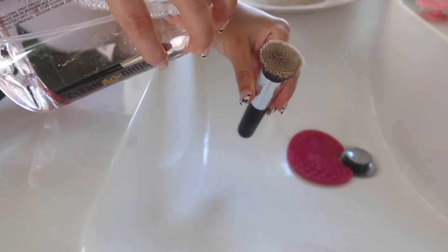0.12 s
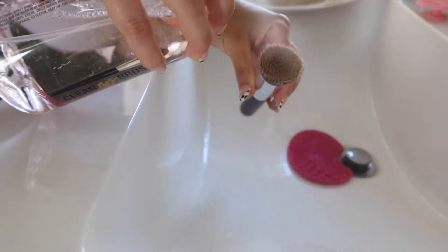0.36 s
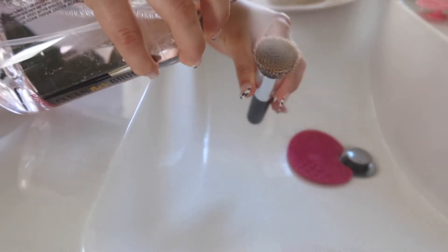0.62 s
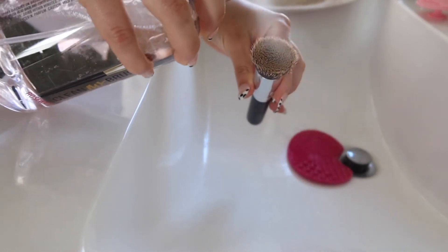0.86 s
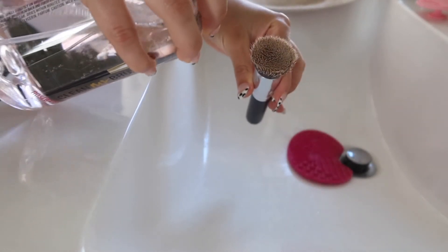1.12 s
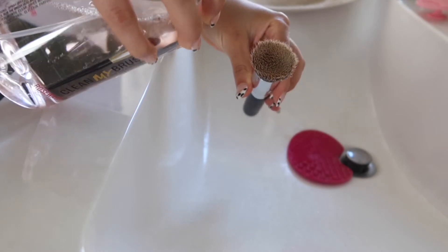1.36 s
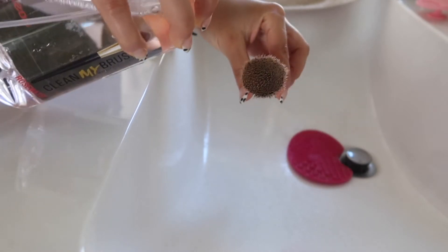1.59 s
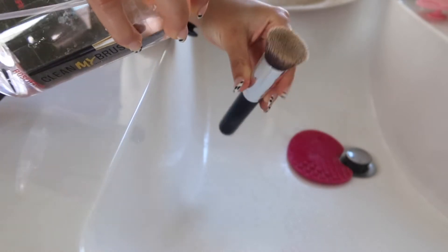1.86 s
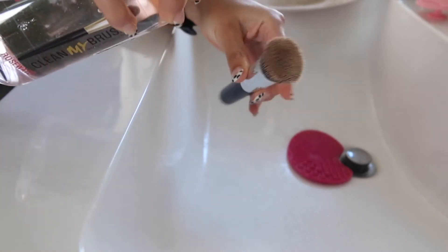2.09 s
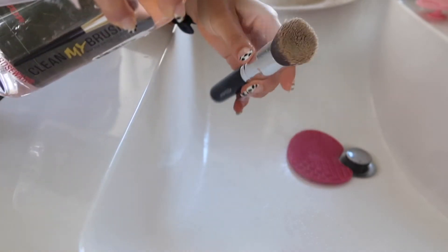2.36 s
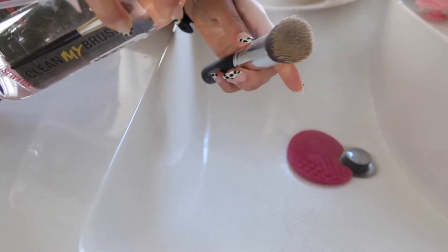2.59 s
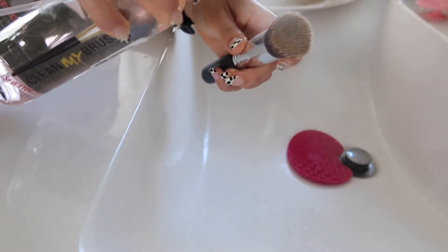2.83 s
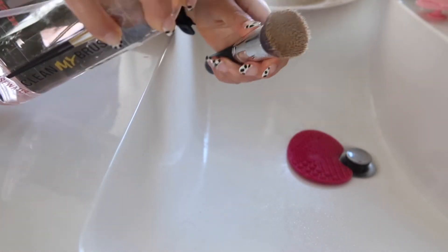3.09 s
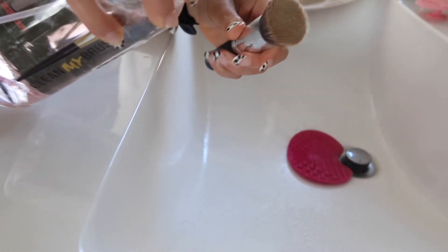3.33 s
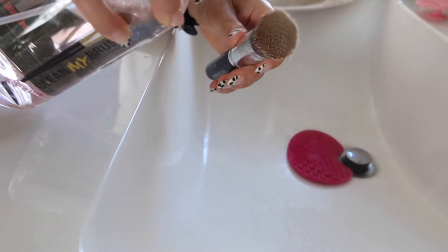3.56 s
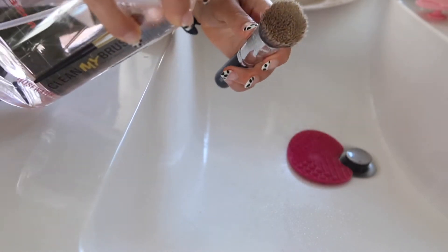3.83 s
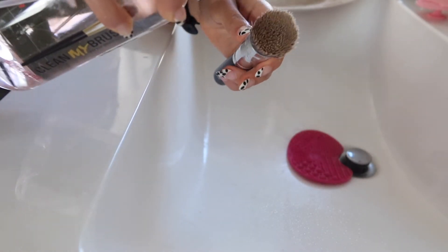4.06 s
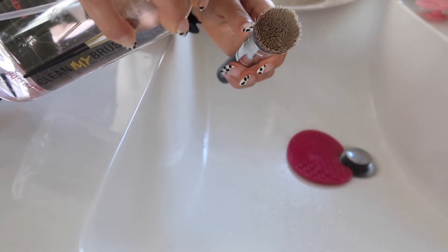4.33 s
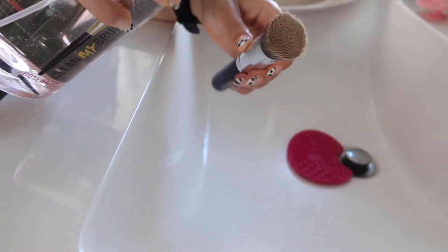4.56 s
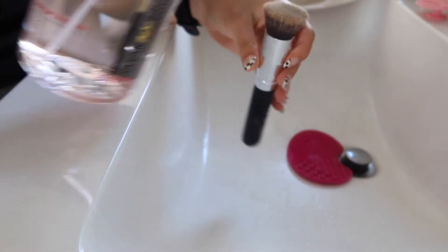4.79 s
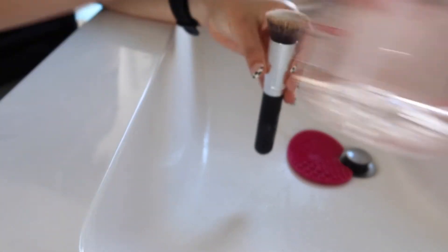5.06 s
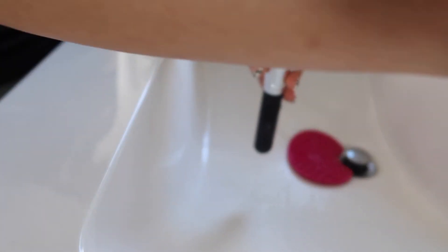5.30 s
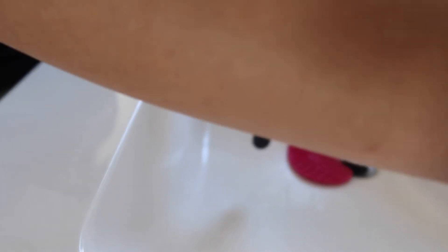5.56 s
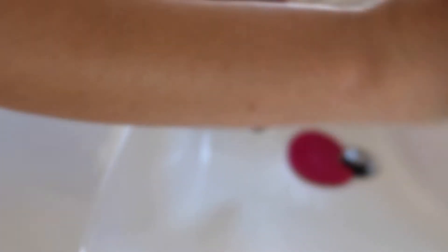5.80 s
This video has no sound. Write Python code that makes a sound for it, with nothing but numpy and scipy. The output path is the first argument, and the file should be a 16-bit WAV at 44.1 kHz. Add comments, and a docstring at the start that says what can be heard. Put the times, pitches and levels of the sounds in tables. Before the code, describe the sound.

A plastic pump bottle is squeezed rapidly about sixteen times, clicking and hissing mist, then thumps down on a counter as a tap starts running.

```python
"""A plastic pump knocks over faint room air, the counter thuds softly under the working arm, mist hisses out.
Sixteen squeezes; then the bottle is set down on the counter and a tap starts to run into the basin.
Knocks and thuds: struck dying modes, thuds with noise clatter. Arm: low sine swells.
Spray and water: coloured droplet clicks over turbulence. Air: drifting noise. Echoes: sparse random taps."""
import sys
import numpy as np
from scipy import signal
from scipy.fft import rfft, irfft
from scipy.io import wavfile
from scipy.ndimage import uniform_filter1d

SR = 44100
rng = np.random.default_rng(int(sys.argv[2]) if len(sys.argv) > 2 else 0)


def voltage_ratio(level):
    """Linear amplitude factor for a level in decibels (scalar or array-like)."""
    return 10 ** (np.asarray(level, float) / 20)


def materialize(psi):
    """Save the field psi as 16-bit PCM at rate SR to the path in sys.argv[1].

    A 1-D psi becomes a single channel; in a 2-D psi each row is a channel.
    """
    bounded = np.clip(np.atleast_2d(psi).T, -1, 1)
    quanta = np.round(bounded * 32767).astype(np.int16)
    wavfile.write(sys.argv[1], SR, quanta)


N = 261072

# steady room air: f/Hz, relative level/dB
AIR = [(12, -28), (20, 10), (109, -8), (149, -7), (274, -12), (307, -10), (465, -11), (550, -19),
       (615, -14), (687, -20), (768, -19.5), (3090, -27), (15600, -46.5)]
# left-right likeness of the air: f/Hz, likeness/1
AIR_SAME = [(60, 1), (240, 0.39), (950, 0.13), (3770, 0.44), (15000, 0.067)]
AIR_RMS_DB = -45.5

# modes of the hollow bottle body: f/Hz, relative level/dB, t60/s
BODY = [(253, -21, 0.036), (318, -36.5, 0.066), (383.5, 3, 0.041), (467, 1, 0.055), (647, -7, 0.02),
        (923, -14, 0.075), (1043, -18, 0.024)]
# modes of the pump head: f/Hz, relative level/dB, t60/s
HEAD = [(1030, -27, 0.005), (1460, -28, 0.0092), (1650, -14.5, 0.0098), (1860, -9.5, 0.016),
        (2215, 4, 0.021), (2603, 6, 0.0077), (2630, -12, 0.0086), (3600, -22, 0.005), (4370, -41, 0.0055)]
# modes of the bright snap: f/Hz, relative level/dB, t60/s
SNAP = [(4000, 3.5, 0.015), (4630, 12.5, 0.0036), (6460, 9.5, 0.0037), (8110, 8.5, 0.012),
        (10200, -45, 0.0035), (13900, 23, 0.0015)]
# how each part is hit: modes, contact/samples, contacts per rattle, longest t60/s
PARTS = [(BODY, 27, 2, .03), (HEAD, 11, 8, .014), (SNAP, 3, 24, .005)]
# finger drives the plunger down: t/s, peak level/dB, body level/dB rel
PRESSES = [(0.002, -32.5, 1), (0.2638, -40, -6), (0.562, -18.5, -14.5), (0.85, -22.5, -5),
           (1.1379, -23, -6.5), (1.4198, -25.5, -11), (1.692, -25, -10), (1.9776, -21.5, -4.5),
           (2.2645, -20, -4.5), (2.535, -21, -3), (2.8042, -20.5, -3), (3.0841, -17, -3.5),
           (3.3531, -20, -4.5), (3.6216, -21, -3), (3.8841, -21.5, -2), (4.1649, -20, -3.5)]
# plunger lets go with a hollow thump: t/s, peak level/dB, body level/dB rel
RETURNS = [(0.4232, -31, 7.5), (1.5869, -36, 12), (1.8407, -28.5, 7), (2.1315, -29, 9), (2.4244, -32, 5.5),
           (2.6919, -32.5, 4), (2.9638, -29, 6), (3.2354, -32.5, 9.5), (3.519, -27.5, 7),
           (3.7787, -31.5, 10.5), (4.0542, -30.5, 12), (4.337, -33, 10.5), (4.519, -39, 8.5)]
# head ticks against its upper stop: t/s, peak level/dB, body level/dB rel
STOPS = [(0.2, -28.5, 1), (0.4838, -27, 1), (0.5072, -29, -7), (0.7401, -32, -8), (0.789, -26.5, -1.5),
         (1.069, -27, 0.5), (1.3278, -35.5, -17), (1.3633, -28, 2.5), (1.652, -35, 6.5), (1.9045, -40, 8),
         (1.917, -37.5, 8.5), (2.2125, -31, 5.5), (2.4976, -31, 2.5), (2.7494, -35, -19), (2.767, -30, 2),
         (3.0387, -31, 1), (3.3156, -22, -6.5), (3.5934, -32, 0), (3.8538, -26.5, -2), (4.13, -31.5, 0.5),
         (4.4114, -27, 2), (4.6573, -28.5, -3), (5.03, -32.5, -29)]
# bright ticks as the grip on the bottle shifts: t/s, peak level/dB, body level/dB rel
NAILS = [(5.0651, -34.5, -9), (5.0797, -31.5, -10), (5.0864, -45, 1), (5.1645, -36, 1.5), (5.245, -49, 9)]
# kinds of knock: knocks, snap level/dB rel, hardness/dB per octave
KINDS = [(PRESSES, -2.5, 0.39), (RETURNS, -9, 2.5), (STOPS, -40, 0.3), (NAILS, 3.4, -3.5)]
RATTLE_S, RATTLE_S_PER_DB = .0035, .0005  # length at -30 dB; harder knocks rattle longer
PLASTIC_LOW_HZ = 160

# soft pushes of the arm on the counter: t/s (swell starts 10 ms before), peak level/dB, f/Hz
PUSHES = [(0.009, -28, 99), (0.05, -31, 115), (0.144, -30, 133), (0.21, -27.5, 113), (0.259, -39, 108),
          (0.308, -34, 110), (0.426, -23, 119), (0.49, -24, 136), (0.517, -30, 113), (0.567, -23, 116),
          (0.726, -32, 112), (0.798, -26, 117), (0.859, -28.5, 123), (1.01, -26.5, 111),
          (1.077, -28.5, 110), (1.153, -29, 116), (1.197, -39, 120), (1.303, -24.5, 114.5),
          (1.363, -30, 122), (1.43, -36.5, 131.8)]
PUSH_S, PUSH_T60_S = 0.022, .062  # lean-in, then decay
# low thuds, the one at 1.48 s swelling again: t/s, peak level/dB, tilt/dB per octave,
# clatter level/dB rel, swell/s, place struck/0-1
THUDS = [(1.482, -10.5, -17, -12.5, 0.0031, .15), (1.523, -20.5, -2, -24, 0.0017, 0),
         (5.531, -3.5, -0.36, -5.5, 0.0015, .85)]
# counter modes: f/Hz, relative level/dB, t60/s
COUNTER = [(86.4, -18, 0.29), (104.1, 4.5, 0.21), (121, 7.5, 0.11), (148.7, 12, 0.17), (188.3, -4.5, 0.36),
           (303, -16, 0.11), (374, -25, 0.57), (435, -24.5, 0.32), (620, -37, 0.4), (630, -8.5, 0.16),
           (720, -23, 0.27), (726, -25, 0.16), (768, -15, 0.2), (1044, -17, 0.1), (1170, -17, 0.17),
           (1210, -22, 0.23), (1249, -19.5, 0.65)]
# close modes of bottle, slab and cupboard, blurred into clatter: f/Hz, relative level/dB
CLATTER = [(60, -55), (130, -16), (190, -9), (300, 5), (520, -3), (625, 14), (780, -8.5), (900, -18),
           (1200, 4), (1600, -20.5), (1950, -17), (2300, -23), (2750, -19), (3200, -25.5), (3800, -24),
           (5100, -29), (11000, -81), (14000, -100)]
# clatter decay: f/Hz, t60/s
CLATTER_T60 = [(200, 0.23), (600, 0.26), (1200, 0.26), (2000, 0.38), (4000, 0.25), (6000, 0.54),
               (10000, 0.059)]
CRACK_DB, CRACK_T60_S = 6, .025  # extra brightness of the first instant

# squeezes: valve opens t/s, stroke/s, mist level/dB, jet level/dB over mist, full pressure at/share of stroke
SPRAYS = [(0.036, 0.081, -37.5, 4.5, 0.6), (0.305, 0.092, -39, 5.5, 0.7), (0.598, 0.081, -36.5, 5, 0.9),
          (0.888, 0.081, -36, 4.5, 0.84), (1.174, 0.078, -36, 5.5, 0.92), (1.461, 0.075, -36, 5.5, 0.43),
          (1.734, 0.078, -37.5, 5, .15), (2.02, 0.084, -37, 5, 0.44), (2.306, 0.082, -36.5, 5, 0.43),
          (2.576, 0.081, -36, 5, 0.3), (2.846, 0.079, -36.5, 5.5, 0.5), (3.126, 0.079, -37, 6.5, .4),
          (3.396, 0.079, -36.5, 5.5, 0.4), (3.670, 0.079, -37, 6, 0.4), (3.927, 0.083, -37, 7, 0.36),
          (4.208, 0.084, -37, 6, 0.14)]
# spray spectrum: f/Hz, relative level/dB
SPRAY = [(180, -10), (300, -16.5), (391, -8), (562, -12), (923, -15), (1000, -11.5), (1180, -10.5),
         (2040, 1.5), (3290, 2.5), (4430, -8.5), (5320, -18.5), (7650, -15), (12100, -16), (14800, -22.5),
         (15600, -40)]
SPLIT_HZ, DROPS_PER_S, DROP_SPREAD_DB, DROP_SHARE = 4850, 7500, 7.5, 0.21
PATCH_RMS_DB = 1.3  # the spray cone wanders, so its colour shifts in patches
FLUTTER_RMS_DB, FLUTTER_S = 1.5, 0.00362  # the jet spits unevenly
POP_S, POP_DB, OPEN_DB = 0.0067, -46, -4  # the valve pops open, short of full pressure
SAG_DB = -3  # pressure at the end of the stroke
SHUT_S, SHUT_DB = .016, -20  # the last of the pressure bleeds off
JET_SLACK = 0.2  # dB the jet regains per dB of lost pressure

# bottle base modes: f/Hz, relative level/dB, t60/s
BASE = [(1870, -1, .05), (1976, -8, 0.13), (2240, -20, 0.073), (2600, -7, 0.11), (2775, 6.5, .04),
        (3220, -7, .06), (3660, 7.5, 0.032), (3880, -16, 0.067), (4750, -9, 0.027), (4900, -6, .04),
        (5400, -22, .05), (6072, -36, 0.046)]
# base lands and rocks once: t/s, peak level/dB
SET_DOWN = [(5.5306, -16.5), (5.546, -31)]
SKID_S = .004  # time constant of the uneven rim contacts

# tap water spectrum: f/Hz, relative level/dB
WATER = [(180, -67), (300, -39), (703, -5), (775, -8), (1250, -15), (1360, -9), (2030, -18), (2670, -15),
         (5330, -40), (10800, -54), (14000, -74)]
TAP_S, TAP_DB, TAP_OPEN_S, TAP_GROW_DB_PER_S = 5.838, -44.5, 0.0027, 15

# tiled room echo colour: f/Hz, level/dB
ROOM_TONE = [(100, -9.5), (300, -7), (1000, -9.5), (3000, -12.5), (6000, -6), (14000, -27)]
# tiled room decay: f/Hz, t60/s
ROOM = [(100, 0.45), (500, 0.46), (2000, 0.4), (6000, 0.25), (14000, 0.34)]
# level of the side signal by frequency: f/Hz, level/dB
SIDE_TONE = [(60, -31), (99, -44), (160, -52), (270, -10), (450, -20), (740, -8), (1220, -19), (2010, -83),
             (3330, -21), (5500, -1.5), (9080, -13.5), (15000, -11)]
# overall tone, with its top edge: f/Hz, level/dB
TONE = [(20, -2.5), (13500, 2.5), (14800, -17), (16000, -21)]
LOW_CUT_HZ = 57.6


def evened(x):
    """Scales to rms 1."""
    return x / np.sqrt(np.mean(x ** 2) + 1e-20)


def peaked(x, db):
    """Scales to a peak level."""
    return voltage_ratio(db) * x / abs(x).max()


def read(points, hz):
    """Reads a table on a log-frequency axis."""
    f, value = np.transpose(points)
    return np.interp(np.log(hz + 1), np.log(f + 1), value)


def colour(x, points, weight=lambda hz: 1):
    """Filters by a dB spectrum, times an optional weight."""
    hz = np.fft.rfftfreq(x.shape[-1], 1 / SR)
    return irfft(rfft(x) * voltage_ratio(read(points, hz)) * weight(hz), x.shape[-1])


def high_pass(x, hz):
    """Second-order Butterworth high-pass."""
    return signal.lfilter(*signal.butter(2, hz / SR * 2, "high"), x)


def add(mix, s, sound):
    """Mixes a sound in at time s."""
    part = mix[round(s * SR):][:len(sound)]
    part += sound[:len(part)]


def blurred(noise, bins, frames):
    """Averages noise over neighbouring bins and frames, rms 1."""
    across = uniform_filter1d(noise, size=bins, axis=0)
    return evened(uniform_filter1d(across, size=frames, axis=1))


def air():
    """Steady room air noise, partly shared by the two sides, drifting in patches."""
    hz = np.fft.rfftfreq(1024, 1 / SR)
    a, b, c, d, noise = rng.standard_normal((N // 256 + 5, 513, 5)).T
    patches = blurred(noise, bins=12, frames=14)
    same = np.clip(read(AIR_SAME, hz), -1, 1)[:, None]
    left, other = a + 1j * b, c + 1j * d
    z = np.array([left, same * left + np.sqrt(1 - same ** 2) * other])
    z *= voltage_ratio(read(AIR, hz)[:, None] + 1.5 * patches)
    sound = signal.istft(z, nperseg=1024, noverlap=768)[1][:, :N]
    return voltage_ratio(AIR_RMS_DB) * evened(sound)


def ring(modes, spread_db, detune, size, tilt_db=0, place=0, longest=1):
    """Dying sines; the place struck sets how much and which way each mode starts."""
    t = np.arange(size) / SR
    hz, db, t60 = np.transpose(modes)[:, :, None]
    chance = rng.standard_normal((2, len(modes), 1))
    db = db + spread_db * chance[0] + tilt_db * np.log2(hz / hz.min())
    shape = np.cos(np.pi * place * np.arange(len(modes)))[:, None]
    level = shape * voltage_ratio(db - 60 * t / np.minimum(t60, longest))
    return (level * np.sin(2 * np.pi * hz * (1 + detune * chance[1]) * t)).sum(0)


def rattle_push(length_s, contact, count):
    """Force of a short rattle: random contacts after a first full one, each softened over its contact time."""
    rattle = np.zeros(600)
    place, force, sign = rng.random((3, count))
    rattle[(place * length_s * SR).astype(int)] = (.4 + .5 * force) * np.sign(sign - .5)
    rattle[0] = 1
    return np.convolve(rattle, np.hanning(contact))  # a longer contact leaves the treble out


def knocks():
    """Each knock is a short rattle of soft contacts that rings bottle, pump head and spring."""
    out = np.zeros(N)
    for rows, snap_db, tilt_db in KINDS:
        for s, db, body_db in rows:
            length_s = np.clip(RATTLE_S + RATTLE_S_PER_DB * (db + 30), .002, .0095)
            levels_db = db + body_db, db, db + snap_db
            for (modes, contact, count, longest), level_db in zip(PARTS, levels_db):
                push = rattle_push(length_s, contact, count)
                sound = ring(modes, 2.5, detune=.07, size=3000, tilt_db=tilt_db, longest=longest)
                add(out, s, peaked(signal.fftconvolve(push, sound), level_db))
    return high_pass(out, PLASTIC_LOW_HZ)  # small parts radiate no bass


def clatter(tilt_db, size):
    """Noise whose bands die at their own speeds, brighter in the first instant."""
    hz, t, z = signal.stft(rng.standard_normal(size), SR, nperseg=512, noverlap=384)
    start_db = read(CLATTER, hz) + tilt_db * np.log2(hz / 100 + 1)
    z *= voltage_ratio(start_db[:, None] - 60 * t / read(CLATTER_T60, hz)[:, None])
    tail = signal.istft(z, SR, nperseg=512, noverlap=384)[1][:size]
    bright = signal.lfilter([1, -.9], [1], tail)
    return tail + voltage_ratio(CRACK_DB - 60 * np.arange(size) / SR / CRACK_T60_S) * bright


def counter():
    """Soft pushes swell one low sine each; thuds ring all modes, whose close pairs beat, and clatter."""
    out, t = np.zeros(N), np.arange(SR // 2) / SR
    for s, db, hz in PUSHES:
        lean = np.sin(np.pi / 2 * np.clip(t / PUSH_S, 0, 1)) ** 2
        swell = lean * voltage_ratio(-60 * np.maximum(t - PUSH_S, 0) / PUSH_T60_S)
        add(out, max(s - .01, 0), voltage_ratio(db) * swell * np.sin(2 * np.pi * (hz * t + rng.random())))
    for s, db, tilt_db, clatter_db, swell_s, place in THUDS:
        rise = 1 - np.exp(-t / swell_s)
        modes = ring(COUNTER, 0, detune=0, size=len(t), tilt_db=tilt_db, place=place)
        add(out, s, peaked(rise * modes, db))
        noise = np.minimum(t / 0.0014, 1) * clatter(tilt_db, size=len(t))
        add(out, s, peaked(noise, db + clatter_db))
    return out


def droplets(per_s, spread_db, share):
    """Dense clicks of uneven size over smooth turbulence."""
    size = voltage_ratio(spread_db * np.minimum(rng.exponential(1, N), 4)) * rng.choice([-1., 1.], N)
    clicks = evened(size * (rng.random(N) < per_s / SR))
    return share * clicks + (1 - share) * rng.standard_normal(N)


def patchy(x, depth_db):
    """Drifting bright and dull patches over time and frequency."""
    z = signal.stft(x, nperseg=256, noverlap=192)[2]
    patches = blurred(rng.standard_normal(z.shape), bins=4, frames=10)
    return signal.istft(z * voltage_ratio(depth_db * patches), nperseg=256, noverlap=192)[1][:N]


def sprays():
    """The jet fills the lower band, the mist the upper; both follow the pressure of the squeeze."""
    def low_share(hz):
        return 1 / (1 + (hz / SPLIT_HZ) ** 12)

    drive = patchy(droplets(DROPS_PER_S, DROP_SPREAD_DB, DROP_SHARE), PATCH_RMS_DB)
    jet = evened(colour(drive, SPRAY, low_share))
    mist = evened(colour(drive, SPRAY, lambda hz: 1 - low_share(hz)))
    flutter = evened(uniform_filter1d(rng.standard_normal(N), int(FLUTTER_S * SR)))
    jet *= voltage_ratio(FLUTTER_RMS_DB * flutter)
    t, out = np.arange(N) / SR, np.zeros(N)
    for opens, length, mist_db, jet_db, full_at in SPRAYS:
        full_s = np.clip(full_at, .05, .95) * length
        s = opens + np.array([-POP_S, 0, full_s, length, length + SHUT_S])
        on = slice(round(s[0] * SR), round(s[-1] * SR))
        pressure_db = np.interp(t[on], s, [POP_DB, OPEN_DB, 0, SAG_DB, SHUT_DB])
        level = voltage_ratio(mist_db + pressure_db) * signal.windows.tukey(len(t[on]), .03)
        jet_gain = voltage_ratio(jet_db - JET_SLACK * pressure_db)
        out[on] += level * (mist[on] + jet_gain * jet[on])
    return out


def set_down():
    """The base clacks on the hard top: uneven, fading rim contacts ring its modes."""
    out, t = np.zeros(N), np.arange(SR // 50) / SR
    for s, db in SET_DOWN:
        skid = rng.standard_normal(len(t)) * np.exp(-t / SKID_S)
        base = ring(BASE, 1, detune=0.0059, size=SR // 4)
        add(out, s, peaked(signal.fftconvolve(skid, base), db))
    return out


def tap():
    """Water rushes in the spout and meets the basin: the tap opens, then the flow grows."""
    t = np.arange(N) / SR - TAP_S
    flow = np.clip(t / TAP_OPEN_S, 0, 1) * voltage_ratio(TAP_DB + TAP_GROW_DB_PER_S * t)
    return flow * evened(colour(droplets(3000, 3.0, 0.39), WATER))


def echoes(x, start, decays):
    """Sparse taps of random sign, one in every 20 samples, each band dying at its own speed."""
    taps = np.zeros(SR)
    at = np.arange(start, SR - 20, 20)
    taps[at + rng.integers(0, 20, len(at))] = rng.choice([-1., 1.], len(at))
    hz, t, z = signal.stft(taps, SR, nperseg=256)
    tail = signal.istft(z * voltage_ratio(-60 * t / read(decays, hz)[:, None]), SR, nperseg=256)[1]
    return signal.fftconvolve(x, tail / np.linalg.norm(tail))[:N]


def scene():
    """Sources in the middle with the tiled room; short echoes add a little width."""
    near = knocks() + counter() + sprays() + set_down() + tap()
    mid = near + colour(echoes(near, start=300, decays=ROOM), ROOM_TONE)
    side_t60 = [(100, 0.11), (2000, 0.084), (14000, 0.24)]  # f/Hz, t60/s
    side = colour(echoes(near, start=20, decays=side_t60), SIDE_TONE)
    return np.array([mid + side, mid - side]) + air()


def low_pass(x):
    """Removes everything above the highest recorded frequency."""
    return signal.sosfilt(signal.butter(12, 15710, fs=SR, output="sos"), x)


def record(dry):
    """Bass roll-off, then overall tone."""
    thin = high_pass(dry, LOW_CUT_HZ)
    return low_pass(colour(thin, TONE))


dry = scene()
out = record(dry)
materialize(out)
```